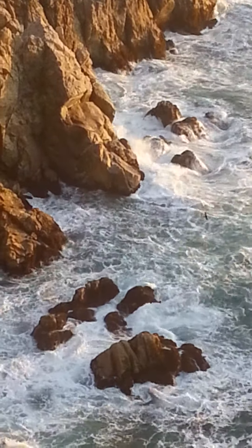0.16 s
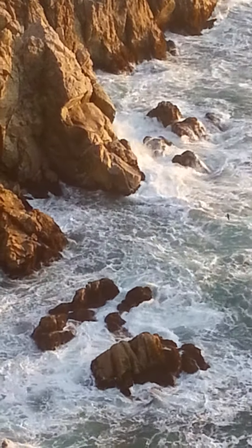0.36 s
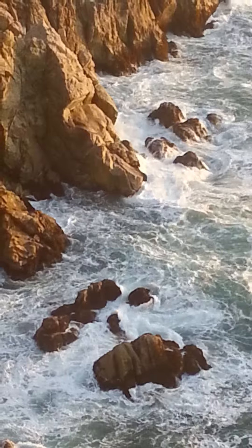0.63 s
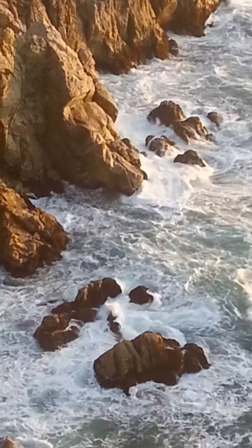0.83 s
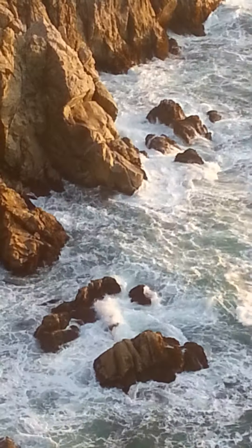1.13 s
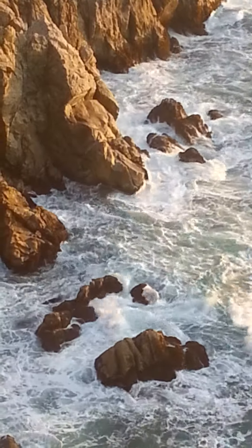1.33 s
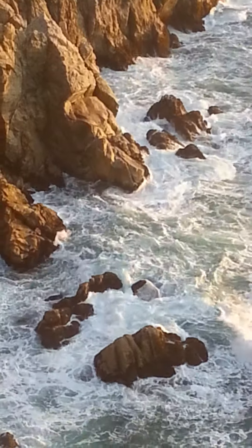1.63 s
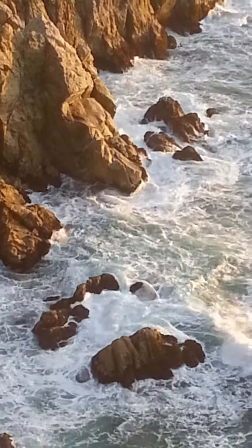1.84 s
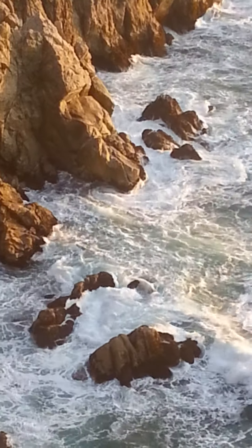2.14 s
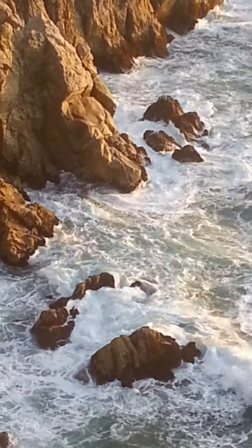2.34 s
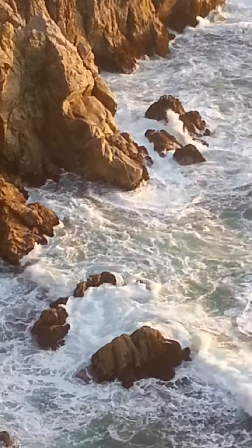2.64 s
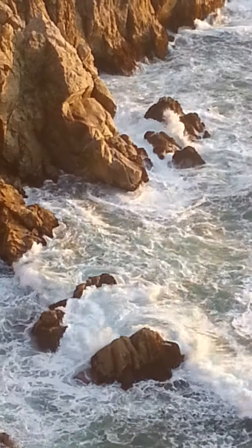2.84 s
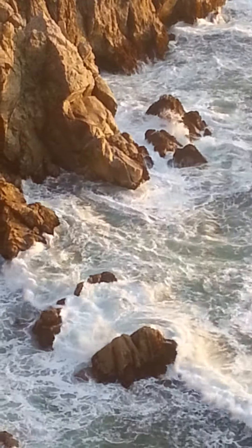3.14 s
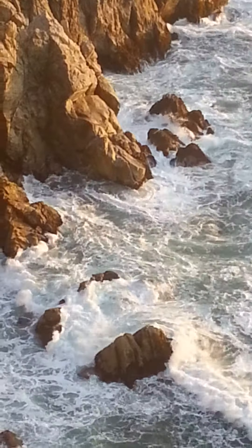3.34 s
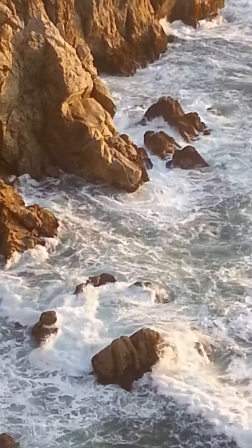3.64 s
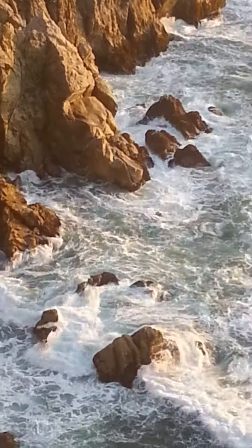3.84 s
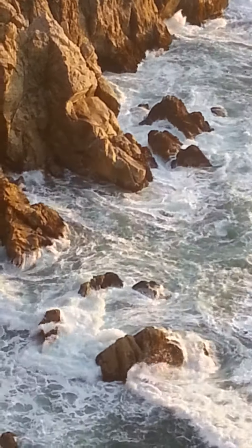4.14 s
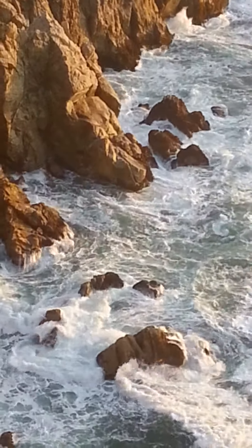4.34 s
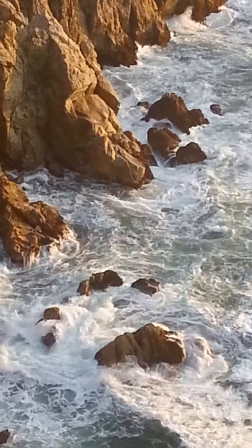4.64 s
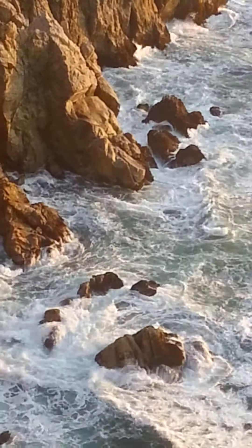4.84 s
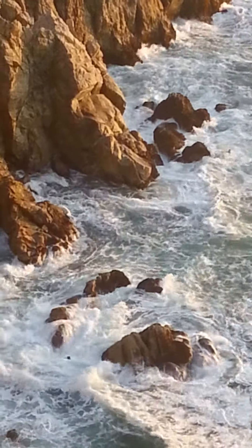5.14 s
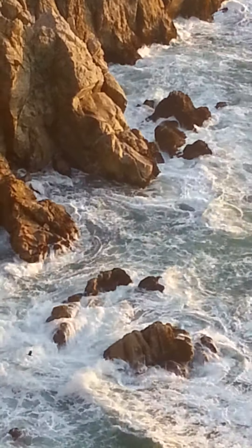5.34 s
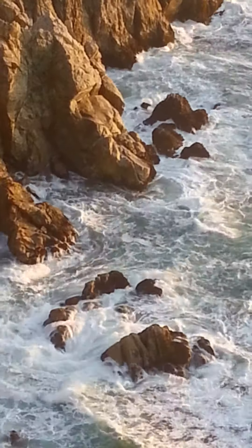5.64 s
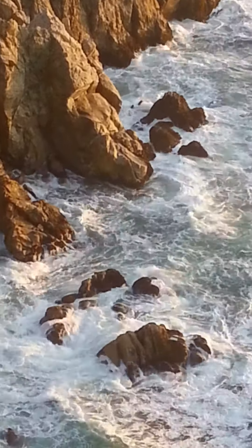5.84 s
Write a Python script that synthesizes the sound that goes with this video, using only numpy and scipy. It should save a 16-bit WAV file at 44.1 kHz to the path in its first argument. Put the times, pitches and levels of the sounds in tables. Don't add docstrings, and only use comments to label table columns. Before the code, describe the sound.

Heavy surf churns around rocks below sea cliffs, a dull steady roar with small plunges and four loud contact thumps on the right.

```python
import sys
import numpy as np
from scipy import signal
from scipy.fft import rfft, irfft
from scipy.io import wavfile
from scipy.ndimage import uniform_filter1d

SR = 44100
rng = np.random.default_rng(int(sys.argv[2]) if len(sys.argv) > 2 else 0)


def field_ratio(decibels):
    return 10 ** (np.asarray(decibels, dtype=float) / 20)


def to_wav(s):
    ch = np.atleast_2d(s).T
    pcm = np.round(np.clip(ch, -1, 1) * 32767)
    wavfile.write(sys.argv[1], SR, pcm.astype(np.int16))


N = 264159
HZ = np.fft.rfftfreq(N, 1 / SR) + 1e-9


def churn(density=0.5):
    bursts = rng.random(N) < density
    return bursts * rng.standard_normal(N) / np.sqrt(density)


def effort():
    # time in seconds, level in dB about the mean.
    swell_points = [(0.0, 2.5), (0.5, 0.8), (0.84, 0.6), (1.5, 0.7), (2.0, -0.3), (2.75, -1.14), (3.2, -2),
                    (3.5, -0.4), (3.75, -1.3), (4.2, 0.55), (4.55, 0.2), (4.9, 1.4), (5.3, -0.2),
                    (5.99, 1.2)]
    swell_depth = (0.64, 0.79, 1.05)
    # crest in seconds, lift of the roar in dB, length in seconds.
    plunges = [(0.09, 3.0, 0.094), (0.284, 3.5, 0.077), (0.427, 5, 0.071), (0.718, 1.5, 0.15),
               (1.28, -0.2, 0.15), (1.75, 1, 0.18), (2.762, 1, 0.11), (3.7, 0.4, 0.16), (3.96, 1.6, 0.11),
               (4.386, 2, 0.041), (5.02, 1.5, 0.095), (5.254, 2, 0.13), (5.623, 1.5, 0.06)]
    plunge_depth = (0.94, 0.2, 0.1)
    roar_rest_db = -0.95

    t_s = np.arange(N) / SR
    swell_db = np.interp(t_s, *np.transpose(swell_points))
    lift_db = roar_rest_db
    for crest_s, peak_db, length_s in plunges:
        lift_db = lift_db + peak_db * np.exp(-((t_s - crest_s) / length_s) ** 2)
    return np.outer(swell_depth, swell_db) + np.outer(plunge_depth, lift_db)


def walk(rate_hz):
    hold = int(SR / rate_hz)
    levels = np.repeat(rng.standard_normal(N // hold + 1), hold)
    return uniform_filter1d(uniform_filter1d(levels, hold), hold)[:N]


def surf():
    layer_hz = (300, 1400, 5000)
    layers_db = effort()
    fields = rfft([churn() for _ in range(3)])
    near = walk(5)
    out = 0
    for step in np.arange(-1, 19):
        band_hz = 30 * 2 ** (step / 2)
        offset = 2 * np.log2(HZ / band_hz)
        if step == 18:
            offset = np.minimum(offset, 0)
        mask = np.cos(np.pi / 2 * np.clip(offset, -1, 1))
        weights = [np.interp(np.log(band_hz), np.log(layer_hz), row) for row in np.eye(3)]
        near = 0.5 * near + 0.24 * walk(5.46)
        band_db = weights @ layers_db + 0.13 * near + 0.31 * walk(16)
        out = out + rfft(field_ratio(band_db) * irfft(fields * mask, N)) * mask
    return out


def along(table):
    hz, values = np.transpose(table)
    return np.interp(np.log(HZ), np.log(hz), values)


def echoes(table):
    out = 1
    for centre_hz, width_hz, centre_db in table:
        base = centre_hz ** 2 - HZ ** 2
        loss = 1j * HZ * width_hz
        top = base + loss * min(field_ratio(centre_db), field_ratio(centre_db / 2))
        bottom = base + loss * min(1, field_ratio(-centre_db / 2))
        out = out * top / bottom
    return out


def scene():
    # frequency in Hz, level in dB.
    left_colour = [(25, 6), (60, 0.5), (130, 0.1), (280, 7.5), (450, 7.5), (850, 1), (1500, -0.95),
                   (2300, -12.3), (3300, -10.5), (4700, -12.5), (5900, -20.5), (7400, -28.5), (8200, -38),
                   (8500, -82)]
    right_colour = [(35, 12.5), (70, 2), (130, -1.6), (260, 6), (450, 7), (850, 2.5), (1500, -2.5),
                    (2200, -12.5), (3800, -14), (5900, -19.5), (6700, -19), (7600, -15.5), (9300, -33),
                    (10600, -56)]
    # frequency in Hz, share [0-1].
    shared = [(30, 0.794), (100, 0.986), (300, 0.991), (800, 0.991), (1300, 0.986), (2500, 0.61),
              (4000, 0.229), (8000, 0.129)]
    # centre in Hz, width in Hz, level at the centre in dB.
    left_echo = [(603, 822, -15.4), (1133, 511, -18.6), (1587, 197, 2.7), (1879, 221, -33.1),
                 (2799, 169, -3.9), (3400, 500, 6), (4250, 250, -6)]
    right_echo = [(507, 900, -19.7), (1147, 602, -7.9), (1531, 898, -9.8), (2228, 444, 5.1)]
    left_lag_s, level_db = -4.4e-5, -16.5

    both, left, right = surf()
    share = np.clip(along(shared), 0, 1)
    direct, scatter = np.sqrt(share) * both, np.sqrt(1 - share)
    lag = np.exp(-2j * np.pi * HZ * left_lag_s)
    left = field_ratio(along(left_colour)) * (direct * echoes(left_echo) * lag + scatter * left)
    right = field_ratio(along(right_colour)) * (direct * echoes(right_echo) + scatter * right)
    return field_ratio(level_db) * irfft([left, right], N)


def hiss():
    hiss_db = [
        [-76],
        [-60],
    ]
    return field_ratio(hiss_db) * rng.standard_normal((2, N))


def jumps():
    # time in seconds, size in dB.
    contacts = [
        (2.33234, -5.6),
        (2.35437, -6.1),
        (2.89193, -6.4),
        (4.19297, -4.8),
    ]
    t = np.arange(N)
    offset = sum(field_ratio(size_db) * np.clip(t - start_s * SR, 0, 1) for start_s, size_db in contacts)
    return np.array([[0], [1]]) * offset


def low_pass(x):
    return signal.sosfilt(signal.butter(12, 14650, fs=SR, output="sos"), x)


def record(dry):
    top_cut_hz, low_cut_hz = 14600, 108
    faulty = dry + jumps() + hiss()
    top_cut = signal.ellip(5, 0.1, 40, top_cut_hz, fs=SR, output="sos")
    low_cut = signal.butter(3, low_cut_hz, "high", fs=SR, output="sos")
    mix = signal.sosfilt(low_cut, signal.sosfiltfilt(top_cut, faulty))
    return low_pass(mix)


dry = scene()
out = record(dry)
to_wav(out)
```